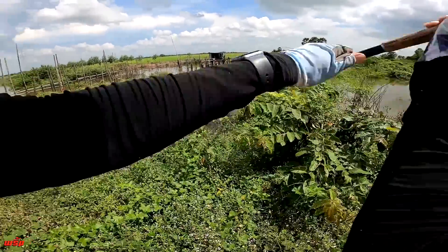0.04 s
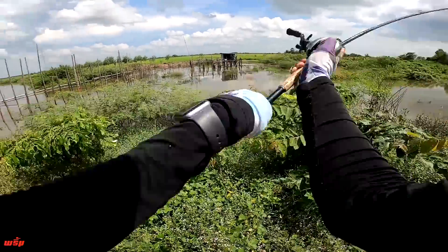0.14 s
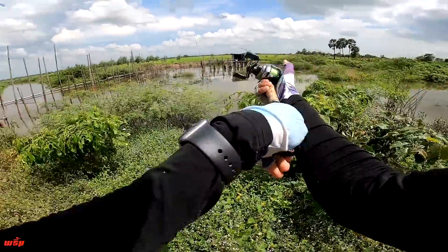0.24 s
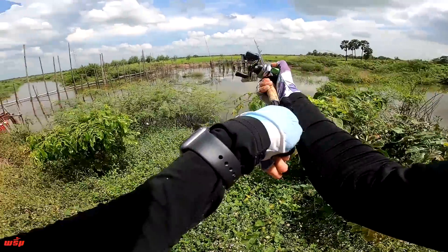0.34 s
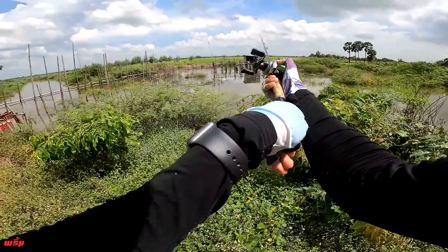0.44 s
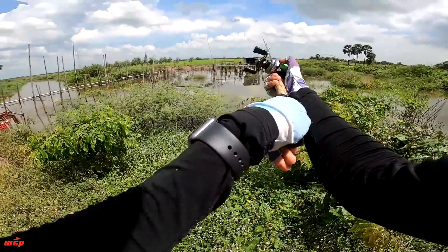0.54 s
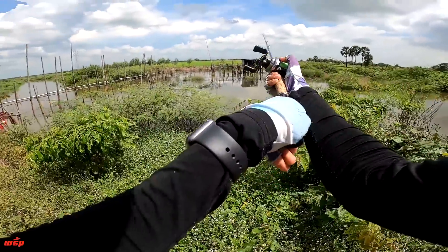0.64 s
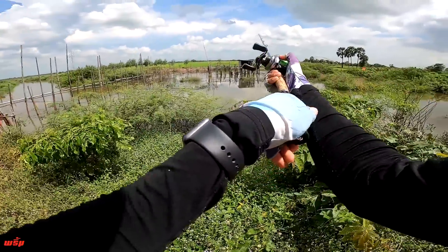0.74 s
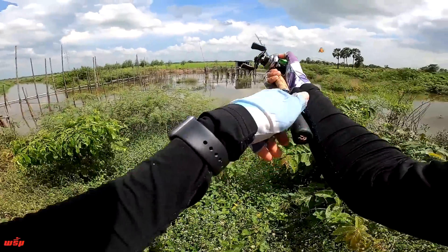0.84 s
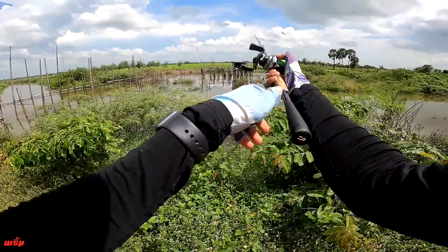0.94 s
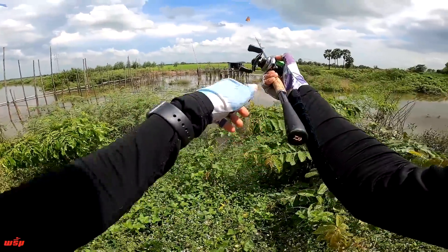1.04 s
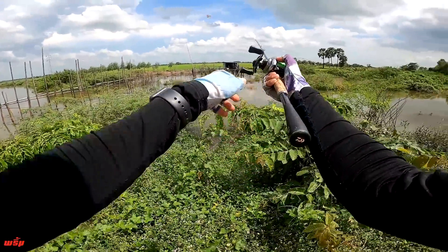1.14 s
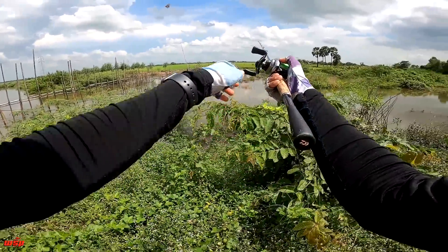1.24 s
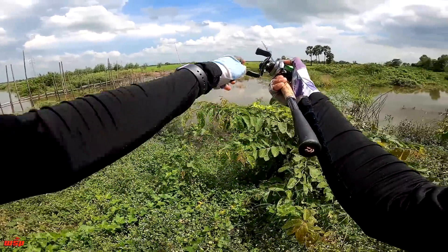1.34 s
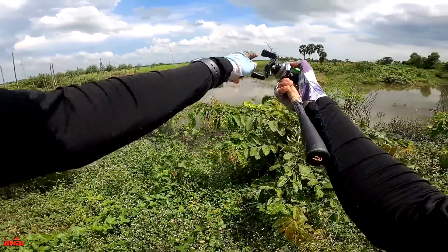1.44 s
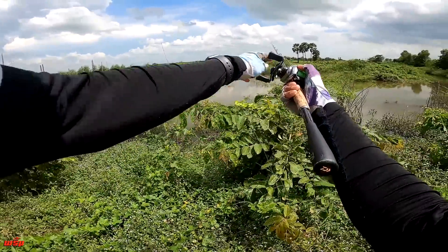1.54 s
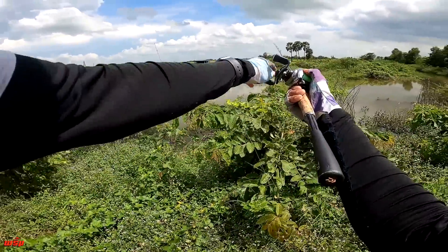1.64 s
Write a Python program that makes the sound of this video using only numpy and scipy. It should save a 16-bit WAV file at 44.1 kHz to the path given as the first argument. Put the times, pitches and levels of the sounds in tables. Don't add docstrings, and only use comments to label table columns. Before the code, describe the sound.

A fishing rod cast, close and outdoors. Sleeves rustle softly, with a sharp plastic reel click at 0.2 s. A bright, airy swish with a rising whistle and small thump peaks near 0.3 s. The spool whirs and hisses from 0.32 s, dropping in pitch and fading by 0.8 s. Cloth rustles and light ticks follow over twittering birds, faint high insect buzzes and light wind until about 1.7 s.

```python
import sys
import numpy as np
from scipy import signal
from scipy.io import wavfile
from scipy.ndimage import uniform_filter1d

SR = 44100
rng = np.random.default_rng(int(sys.argv[2]) if len(sys.argv) > 2 else 0)


def waveform_to_disk(signal):
    frames = np.transpose(np.atleast_2d(signal))
    scaled = np.clip(frames, -1, 1) * 32767
    samples = np.round(scaled).astype(np.int16)
    wavfile.write(sys.argv[1], SR, samples)


def volts_from_db(level):
    exponent = np.asarray(level, float) / 20
    return 10 ** exponent


N = 74970
T = np.arange(N) / SR

# (frequency [Hz], density [dB per Hz])
WIND_SPECTRUM = [(20, -18), (45, -8.5), (90, -3.5), (200, -13), (450, -18), (900, -22), (1500, -37),
                 (3000, -90)]
# (time [s], level [dB])
GUSTS = [(0, -56), (.12, -63), (.25, -49.5), (.33, -53), (.42, -65), (.76, -67), (.85, -51.5), (.9, -63),
         (1.05, -52), (1.3, -54), (1.45, -53), (1.58, -47.5), (1.7, -53)]
# (frequency [Hz], density [dB per Hz])
FIELD_SPECTRUM = [(110, -34), (190, -5.5), (350, -4.5), (740, -7.5), (1250, -11), (4770, -8.5), (8740, -32),
                  (11200, -33.5), (15000, -37)]
# (time [s], level [dB])
BREEZE_LEVEL = [(0, -55.5), (.12, -55), (.4, -48.5), (.6, -54.5), (.8, -54.5), (.95, -49.5), (1.15, -56.5),
                (1.33, -58), (1.5, -54.5), (1.7, -53.5)]
# (time [s], length [s], level [dB])
INSECT_BUZZES = [(0.503, 0.052, -66), (0.643, 0.06, -60.5), (0.783, .015, -65.5), (.94, 0.017, -64),
                 (0.983, 0.045, -63), (1.034, 0.08, -60), (1.324, 0.079, -67), (1.407, .06, -72)]
# (time [s], frequency [Hz], level [dB])
INSECT_WHISTLES = [
    [(.62, 11200, -72), (.645, 12700, -67), (.68, 13450, -70), (.715, 13350, -70), (.77, 12450, -73),
     (.85, 12450, -75), (.86, 12400, -90)],
    [(.8, 13700, -82), (.87, 13750, -76), (.9, 14250, -70), (.935, 13550, -77), (.96, 13600, -63),
     (.99, 14050, -78), (1.02, 13850, -78), (1.03, 13700, -95)],
    [(1.09, 14700, -74), (1.11, 13800, -73), (1.125, 13000, -75)],
]
# (time [s], frequency [Hz], level [dB])
FAR_CHORUS = [(0, 2896, -48), (.07, 2808, -48.5), (.11, 3686, -50), (.16, 3100, -50), (.3, 3900, -46),
              (.7, 4033, -50), (1, 4004, -54), (1.15, 3987, -56.5), (1.3, 3900, -58.5), (1.45, 3820, -58.5),
              (1.55, 4180, -55), (1.7, 4210, -59)]
# (time [s], number of notes, level [dB], frequency [Hz])
BIRD_RUNS = [(.202, 1.5, -45, 4300), (0.552, 3.5, -53, 3980), (.634, 2.5, -45.5, 3910),
             (.727, 3.5, -45.5, 3960), (.778, 1.5, -52, 3606), (.745, 6.5, -50, 4290),
             (.93, 1.5, -54, 3350), (.815, 3.5, -45, 3920), (0.904, 2.5, -47, 3845), (.955, 2.5, -49, 3830),
             (1.016, 1.5, -50, 4740), (1.014, 1.5, -52, 4100), (1.029, 1.5, -47.5, 4550),
             (1.047, 1.5, -53, 4670), (1.001, 1.5, -53, 5550), (1.042, 1.5, -48.5, 5530),
             (1.095, 1.5, -44.5, 3770), (1.115, 2.5, -49.5, 3950), (1.085, 2.5, -52, 4800),
             (1.148, 1.5, -57, 4720), (1.174, 2.5, -56, 4010), (1.18, 2.5, -57, 4670),
             (1.214, 2.5, -47, 3797), (1.262, 1.5, -58, 3894), (1.425, 1.5, -52, 3620),
             (1.48, 1.5, -53, 3150), (1.502, 2.5, -47.5, 3904), (1.545, 2.5, -52, 3814),
             (1.505, 3.5, -52.5, 5000), (1.586, 3.5, -51, 4750), (1.595, 2.5, -52, 3860),
             (1.628, 2.5, -48, 3950), (1.655, 2.5, -61, 4500), (1.67, 2.5, -59, 4110)]
# (time [s], length [s], level [dB], centre frequency [Hz])
SLEEVE_RUSTLES = [(.03, 0.034, -43.5, 2300), (0.13, 0.17, -43.5, 2060), (0.0058, 0.056, -49.5, 3000),
                  (.95, 0.066, -45, 1800), (0.34, 0.13, -54.5, 10500), (0, 0.17, -54.5, 4700),
                  (1.37, 0.44, -57.5, 4800), (.652, 0.03, -39.5, 1750), (.652, 0.021, -45.5, 830),
                  (0.46, 0.023, -44, 2900), (.4, 0.049, -39, 2600), (.465, 0.02, -41, 2200),
                  (0.727, 0.017, -42, 1820), (0.882, 0.16, -48.5, 1260), (1.03, 0.092, -47, 1870),
                  (1.4, 0.14, -56, 2760), (1.58, 0.11, -54, 2500)]
# (time [s], peak level [dB], frequency [Hz])
REEL_TICKS = [(0.1182, -32, 1800), (.1191, -36, 4800), (0.1995, -19.5, 3300), (.1992, -28, 2080),
              (.2298, -30, 3000), (0.7828, -27, 3870), (0.8913, -29.5, 2400), (0.929, -33, 3770),
              (.985, -26, 1500), (.986, -30, 2280), (1.056, -35, 2000), (1.072, -37, 1700),
              (.953, -34, 3000), (1.188, -35, 2580), (1.252, -38, 1900), (1.2688, -35, 3770),
              (1.3701, -36, 3410), (1.479, -31, 2410)]
# (time [s], rate [turns per s], level [dB])
SPOOL_SPEED = [
    (.315, 366, -44),
    (.36, 350, -41),
    (.43, 318, -43),
    (.5, 302, -45),
    (.56, 268, -47),
    (.64, 228, -50),
    (.72, 203, -55),
    (.84, 177, -68),
]
SPOOL_ORDER_LEVELS = [-6, 0, -13, -5, -1, -6, -11]
# (frequency [Hz], density [dB per Hz])
LINE_SPECTRUM = [(250, -11), (500, 0), (1000, -8.5), (2000, 1.5), (4000, -7.5), (7000, -28), (11500, -33.5),
                 (15000, -48)]
# (time [s], level [dB])
ROD_AIR_LEVEL = [
    (.2, -42.5),
    (.226, -40.5),
    (.236, -30),
    (.249, -29),
    (.258, -23),
    (.3, -17.5),
    (.312, -22),
    (.335, -28),
    (.358, -33.5),
]
# (frequency [Hz], density [dB per Hz])
ROD_AIR_SPECTRUM = [(150, -29), (450, -12), (800, -11.5), (1300, -9.5), (2200, -8.5), (3800, -8),
                    (7000, -17), (12000, -31.5), (15000, -37)]
# (time [s], frequency [Hz], level [dB])
VORTEX_TONE = [
    (.249, 950, -30),
    (.254, 1100, -17),
    (.263, 1350, -20),
    (.272, 1700, -14),
    (.283, 1600, -21),
    (.299, 1900, -16),
    (.311, 2000, -27),
    (.32, 2100, -22),
    (.335, 1950, -32),
]
# (time [s], length [s], level [dB], frequency [Hz])
TIP_WHISTLES = [
    (.232, .022, -33, 4300),
    (.262, .026, -27, 3400),
    (.289, .02, -20, 3850),
    (.325, .014, -24, 3500),
    (.328, .02, -31, 4100),
    (.33, .05, -36, 1800),
    (.243, .01, -30, 900),
]


def rms_one(x):
    return x / np.sqrt(np.mean(x ** 2) + 1e-20)


def in_time(rows):
    s, *columns = np.transpose(rows)
    inside = np.clip(np.minimum(T - s[0], s[-1] - T) / .006 + 1, 0, 1)
    return [np.interp(T, s, c) for c in columns] + [inside]


def drift(rate):
    r = np.exp(-80 * np.pi * rate / SR)
    white = rng.standard_normal(N // 40 + 2002)
    slow = signal.lfilter([1], [1, -2 * r, r * r], white)[2000:]
    return np.interp(np.arange(N) / 40, np.arange(len(slow)), rms_one(slow - slow.mean()))


def hump(s, length):
    u = np.clip((T - s) / length, 0, 1)
    return np.sin(np.pi * u ** 0.87) ** 0.79


def resonance(x, hz, width_hz):
    r = np.exp(-np.pi * width_hz / SR)
    return signal.lfilter([1 - r, 0, r - 1], [1, -2 * r * np.cos(2 * np.pi * hz / SR), r * r], x + 1e-18)


def ringing_noise(hz, width_hz):
    white = rng.standard_normal(N)
    return rms_one(resonance(resonance(white, hz, width_hz), hz, width_hz))


def rough_tone(hz, width_hz):
    r = np.exp(-np.pi * width_hz / SR)
    width = signal.lfilter([1], [1, -2 * r, r * r], rng.standard_normal((2, N)))
    phase = 2 * np.pi * np.cumsum(hz * np.ones(N)) / SR
    return rms_one(width[0] * np.cos(phase) + width[1] * np.sin(phase))


def banded_noise(spectrum, patchy_db, rate):
    out, together = 0, drift(rate)
    edges = 20 * 2 ** np.arange(0, 9.7, 1 / 3)
    white = rng.standard_normal((2, N + 9000))
    hz, db = np.transpose(spectrum)
    for k, (low, high) in enumerate(zip(edges, edges[1:])):
        sos = signal.butter(2, [low, high], "band", fs=SR, output="sos")
        band = signal.sosfilt(sos, white[k % 2])[-N:]
        level_db = np.interp(np.log(low * high) / 2, np.log(hz), db)
        out = out + band * volts_from_db(level_db + patchy_db * (0.52 * together + drift(rate)))
    return rms_one(out)


def microphone_wind():
    return volts_from_db(in_time(GUSTS)[0] + 2.5) * banded_noise(WIND_SPECTRUM, patchy_db=1.5, rate=10)


def far_field():
    return volts_from_db(in_time(BREEZE_LEVEL)[0] + 8) * banded_noise(FIELD_SPECTRUM, patchy_db=0.87, rate=31)


def insect_buzz():
    wing = ringing_noise(hz=11140, width_hz=600)
    throb = volts_from_db(2.9 * np.sin(2 * np.pi * 44 * T))
    return wing * throb * sum(volts_from_db(db) * hump(s, length) ** 0.28 for s, length, db in INSECT_BUZZES)


def insect_whistle():
    out = 0
    for rows in INSECT_WHISTLES:
        hz, db, inside = in_time(rows)
        hz = uniform_filter1d(hz, size=500)
        tone = np.sin(2 * np.pi * np.cumsum(hz) / SR)
        out = out + inside * volts_from_db(db + 3 + 2.5 * drift(40)) * tone
    return out


def bird_chorus():
    hz, db, _ = in_time(FAR_CHORUS)
    return volts_from_db(db + 2.3 * drift(38)) * rough_tone(hz, width_hz=800)


def twitters():
    note_gap_s, note_s, pitch_spread = .021, .014, .015
    out, chance = 0, rng.standard_normal((len(BIRD_RUNS), 6, 3))
    for (s, notes, db, hz), row in zip(BIRD_RUNS, chance):
        fall = .13 * (hz < 4400)
        for k, (pitch, late, loud) in enumerate(row[:int(notes)]):
            start = s + note_gap_s * (k + 0.11 * late * (k > 0))
            u = np.clip((T - start) / note_s, 0, 1)
            note_hz = hz * (1 + pitch_spread * pitch * (k > 0))
            phase = 2 * np.pi * note_hz * note_s * (u - fall * (u * u - u) / 2)
            out = out + volts_from_db(db + 5 - 1.2 * k + .5 * loud) * hump(start, note_s) * np.sin(phase)
    rough_hz = 300
    hoarse = rms_one(signal.lfilter([1], [1, -np.exp(-2 * np.pi * rough_hz / SR)], rng.standard_normal(N)))
    out = out * (1 + .35 * hoarse)
    echoes = [(.007, .3), (.017, -.15), (.031, .12)]  # (lag [s], gain)
    return out + sum(gain * np.roll(out, int(lag * SR)) for lag, gain in echoes)


def rustles():
    grains_per_s, width_octaves = 2600, 1.34
    clicks = (rng.random(N) < grains_per_s / SR) * rng.standard_normal(N)
    grains = clicks * volts_from_db(3.5 * np.minimum(rng.exponential(1, N), 2))
    out = 0
    for s, length, db, hz in SLEEVE_RUSTLES:
        edges = hz * 2 ** (width_octaves * np.array([-.5, .5]))
        band = signal.sosfilt(signal.butter(2, edges, "band", fs=SR, output="sos"), grains)
        shape = hump(s, length)
        out = out + volts_from_db(db) * shape * band / np.sqrt(np.average(band ** 2, weights=shape ** 2))
    return out


def ticks():
    t60_s, crack_db = 0.0059, -35
    out = np.zeros(N)
    crack = signal.lfilter([1, -1], [1, -.6], rng.standard_normal(N))
    for s, db, hz in REEL_TICKS:
        u = np.maximum(T - s, 0)
        ring = np.sin(2 * np.pi * hz * u)
        out += (T > s) * volts_from_db(db - 60 * u / t60_s) * (ring + volts_from_db(crack_db) * crack)
    return out


def bearing():
    u = T - .33
    level = volts_from_db(-48.5 - 19 * u + drift(34))
    return np.clip(u / 0.02, 0, 1) * level * ringing_noise(hz=7030, width_hz=650)


def spool():
    fade_db_per_s, low_cut_hz, wobble_db = 7, 200, 1.6
    hz, db, inside = in_time(SPOOL_SPEED)
    phase = 2 * np.pi * np.cumsum(hz * (1 + 0.0042 * drift(28.4))) / SR
    hum = 0
    for k, order_db in enumerate(SPOOL_ORDER_LEVELS, 1):
        level_db = order_db + wobble_db * np.sqrt(k) * drift(25) - fade_db_per_s * (k - 2) * (T - .4)
        radiation = 1 / (1 + (low_cut_hz / (k * hz)) ** 6)
        hum = hum + volts_from_db(level_db) * np.sin(k * phase) * radiation
    hiss = volts_from_db(4) * banded_noise(LINE_SPECTRUM, patchy_db=1.8, rate=55)
    return inside * volts_from_db(db) * (np.sqrt(2) * hum + hiss)


def rod_body():
    u = np.maximum(T - .2935, 0)
    thump = volts_from_db(-21 - 60 * u / .035) * np.sin(2 * np.pi * 220 * u)
    butt_hz = 765
    butt_tone = .4 * rough_tone(butt_hz, 120) + np.sin(2 * np.pi * butt_hz * T)
    butt = volts_from_db(-23) * hump(.272, .022) * butt_tone
    hum = volts_from_db(-49.5) * hump(0.936, .14) * np.sin(2 * np.pi * 265 * T)
    return thump + butt + hum


def tip_whistles():
    return sum(volts_from_db(db) * hump(s, length) * rough_tone(hz, width_hz=450) for s, length, db, hz in TIP_WHISTLES)


def rod_swish():
    air_db, inside = in_time(ROD_AIR_LEVEL)
    air = inside * volts_from_db(air_db) * banded_noise(ROD_AIR_SPECTRUM, patchy_db=0.5, rate=85)
    hz, db, inside = in_time(VORTEX_TONE)
    width_hz = 380
    tone = rough_tone(hz, width_hz) + volts_from_db(-9) * rough_tone(2 * hz, width_hz)
    return air + inside * volts_from_db(db) * tone


def scene():
    background = microphone_wind() + far_field()
    animals = insect_buzz() + insect_whistle() + bird_chorus() + twitters()
    reel = ticks() + bearing() + spool()
    rod = rod_body() + tip_whistles() + rod_swish()
    mid = background + animals + rustles() + reel + rod
    return np.array([mid, mid])


def roll_off(x):
    return signal.sosfilt(signal.butter(12, 15300, fs=SR, output="sos"), x)


def record(dry):
    rolled_off = signal.sosfilt(signal.butter(4, 13100, fs=SR, output="sos"), dry)
    dry = 0.8 * np.tanh(rolled_off / 0.81)
    turn = np.exp(1j * 6 * drift(90))
    turned = np.real(signal.hilbert(dry[0]) * turn)
    high_pass = signal.cheby2(10, 45, 10500, "high", fs=SR, output="sos")
    top = signal.sosfilt(high_pass, turned + .2 * dry[0])
    lagged = np.roll(dry[0], int(.004 * SR))
    side = volts_from_db(-3) * top + volts_from_db(-34.5) * lagged
    return roll_off(dry + side * [[1], [-1]])


dry = scene()
out = record(dry)
waveform_to_disk(out)
```